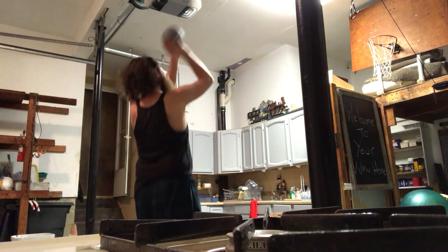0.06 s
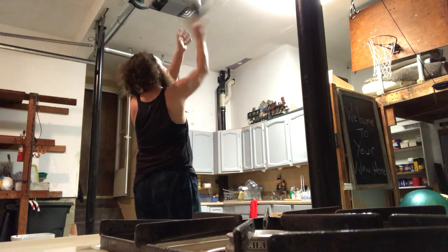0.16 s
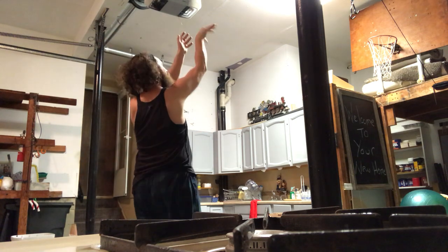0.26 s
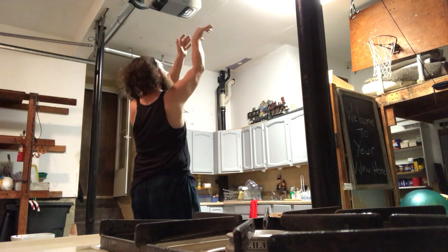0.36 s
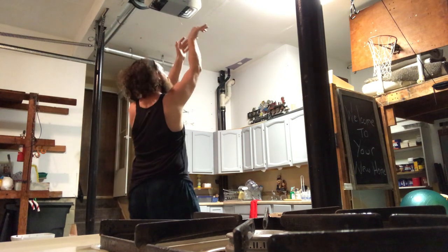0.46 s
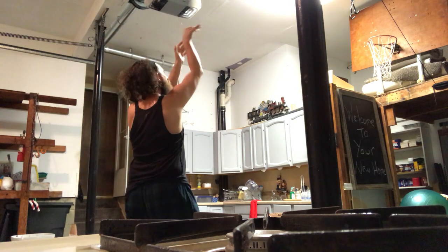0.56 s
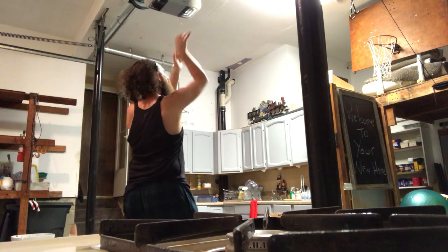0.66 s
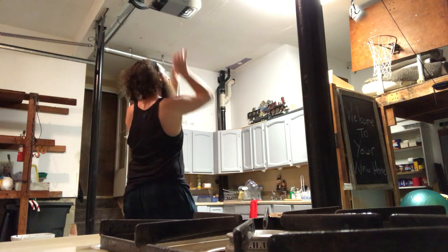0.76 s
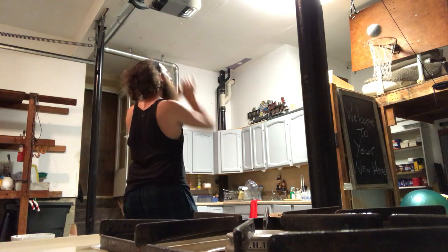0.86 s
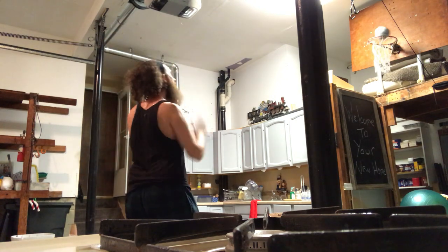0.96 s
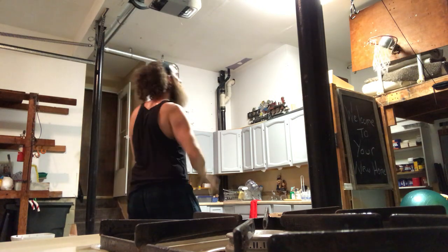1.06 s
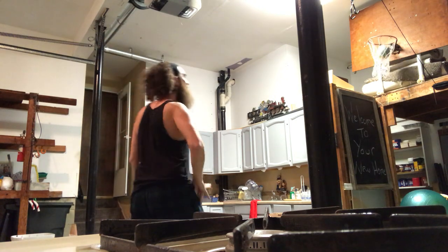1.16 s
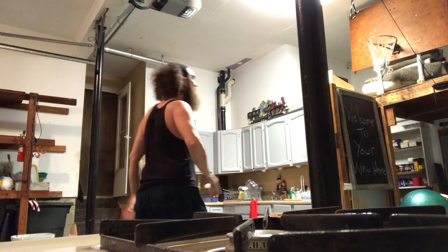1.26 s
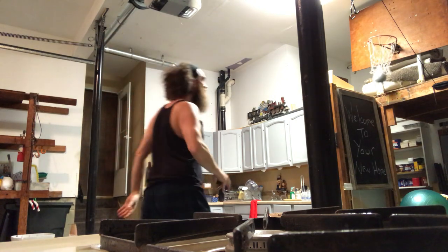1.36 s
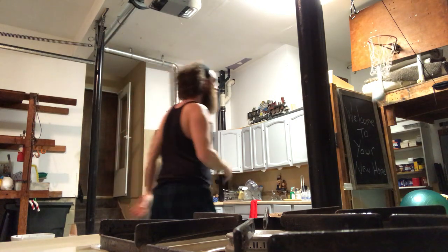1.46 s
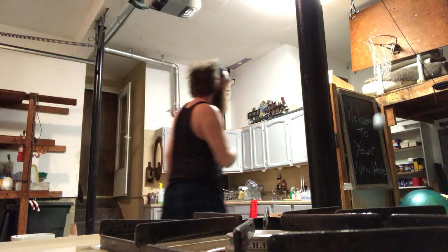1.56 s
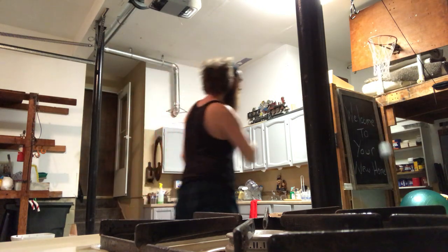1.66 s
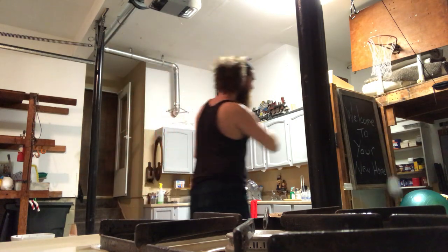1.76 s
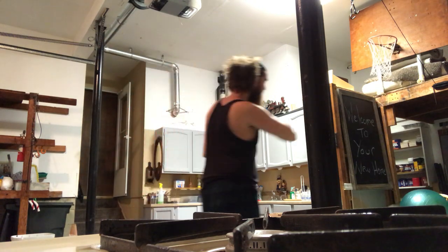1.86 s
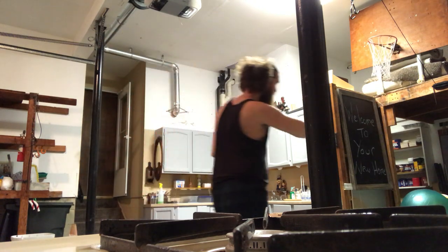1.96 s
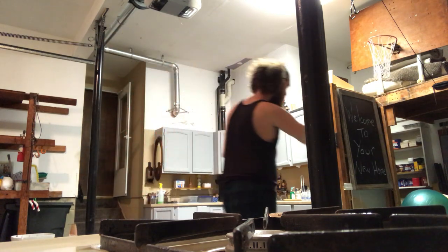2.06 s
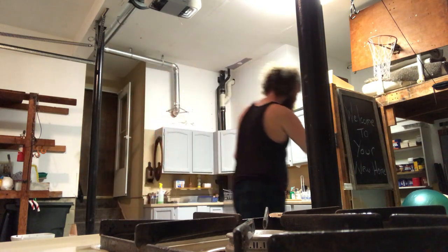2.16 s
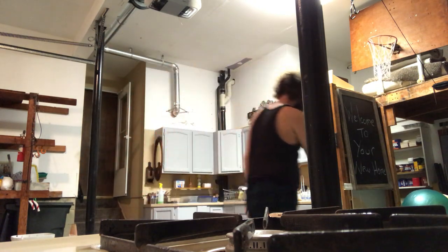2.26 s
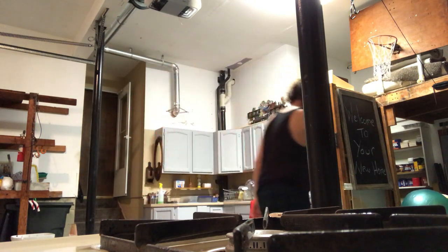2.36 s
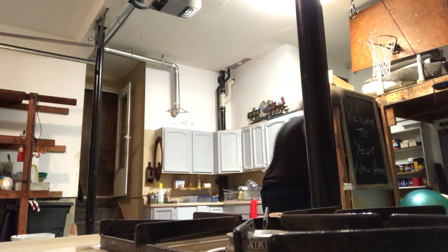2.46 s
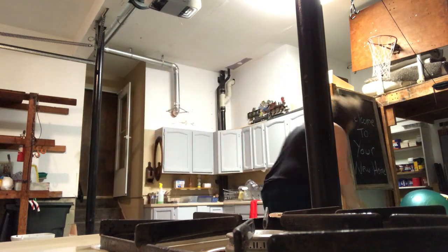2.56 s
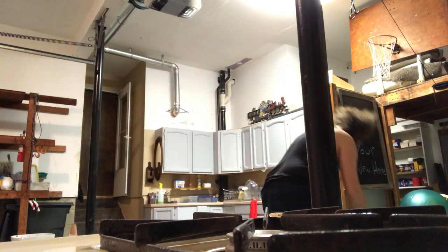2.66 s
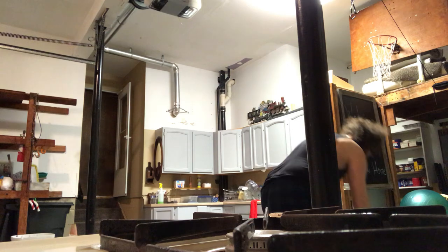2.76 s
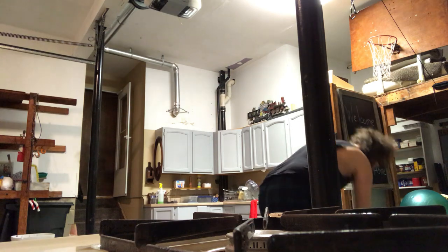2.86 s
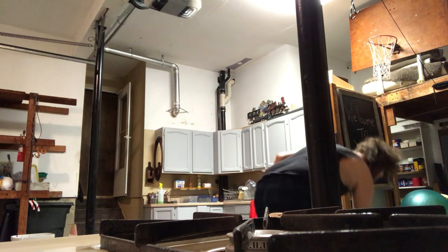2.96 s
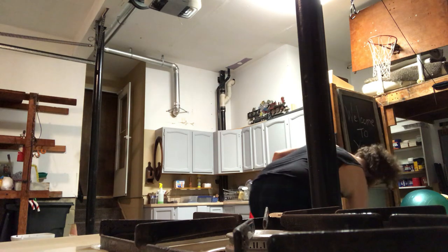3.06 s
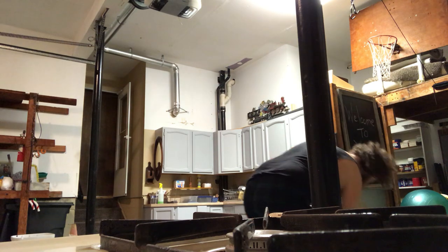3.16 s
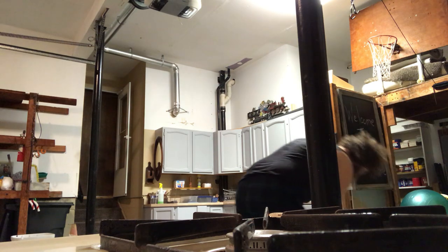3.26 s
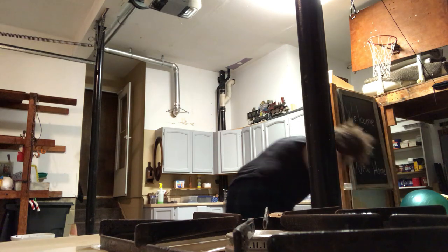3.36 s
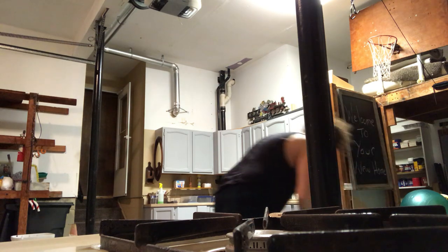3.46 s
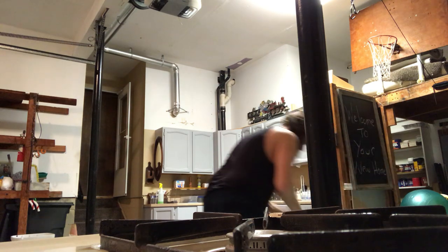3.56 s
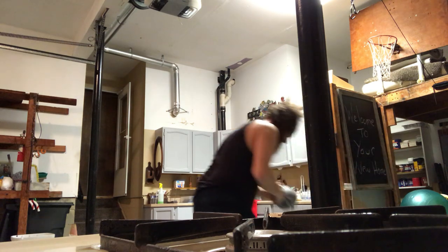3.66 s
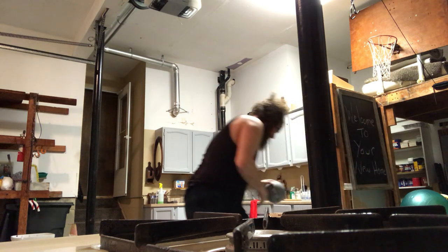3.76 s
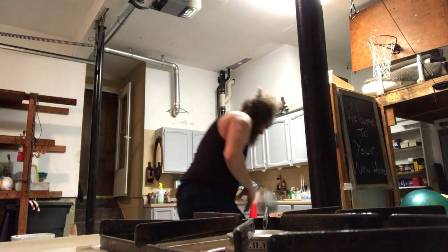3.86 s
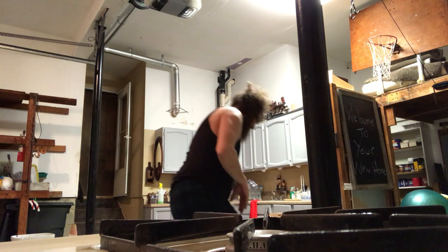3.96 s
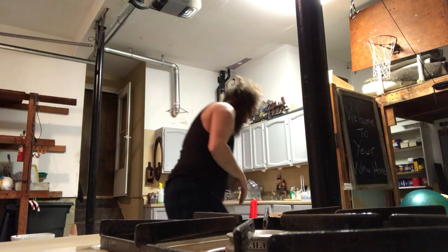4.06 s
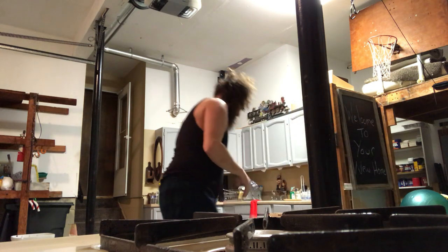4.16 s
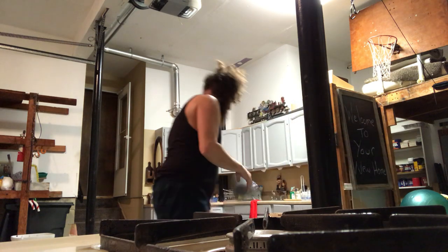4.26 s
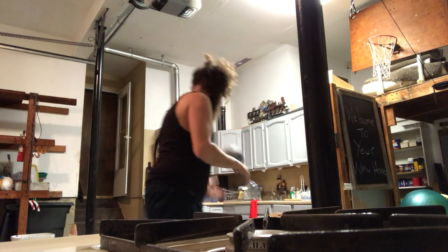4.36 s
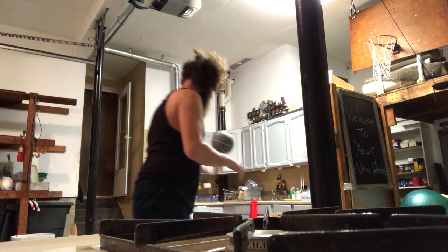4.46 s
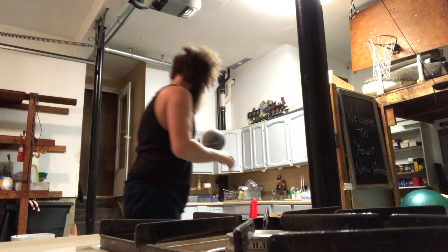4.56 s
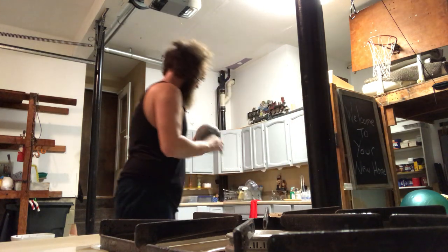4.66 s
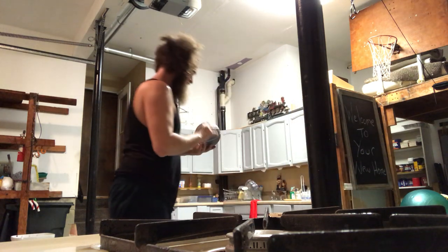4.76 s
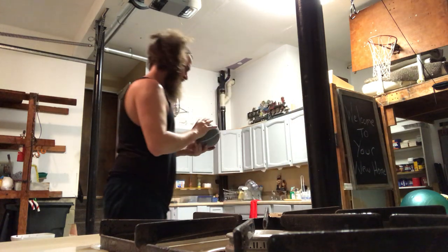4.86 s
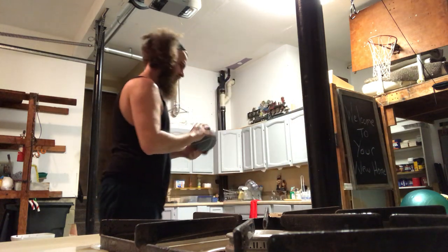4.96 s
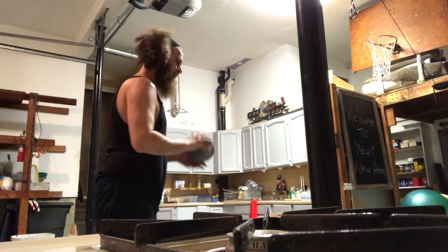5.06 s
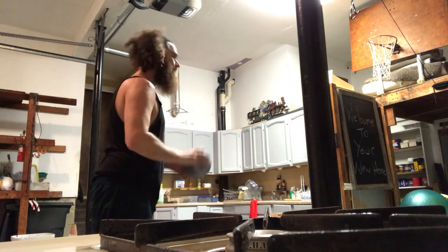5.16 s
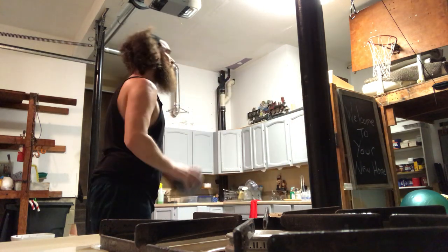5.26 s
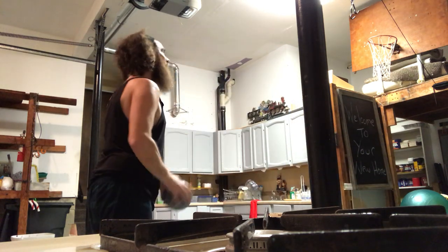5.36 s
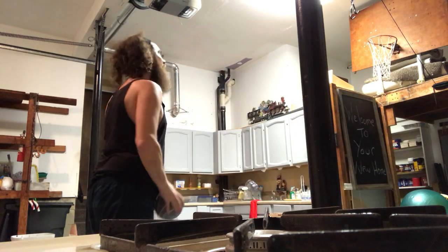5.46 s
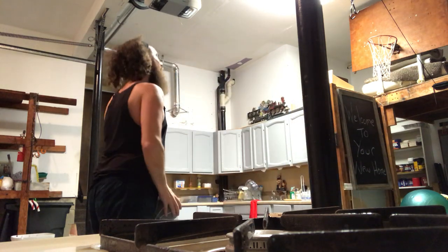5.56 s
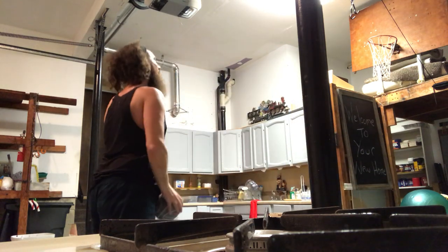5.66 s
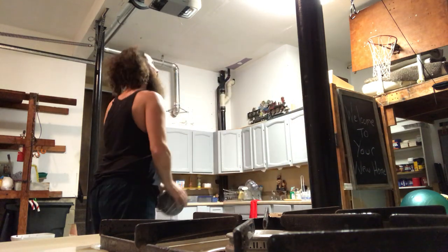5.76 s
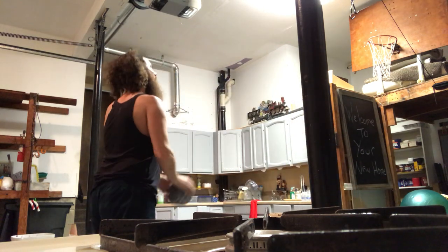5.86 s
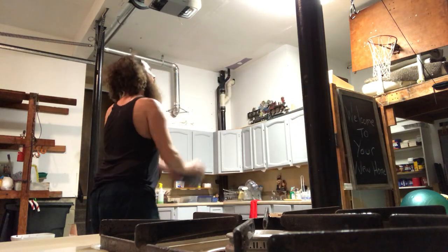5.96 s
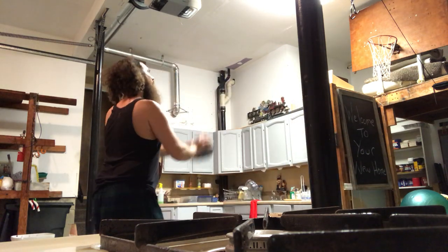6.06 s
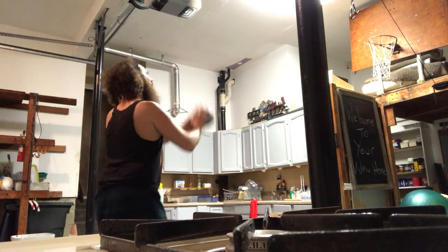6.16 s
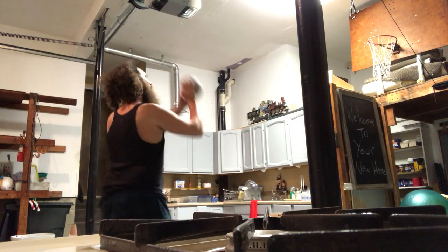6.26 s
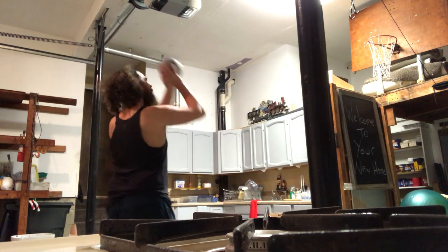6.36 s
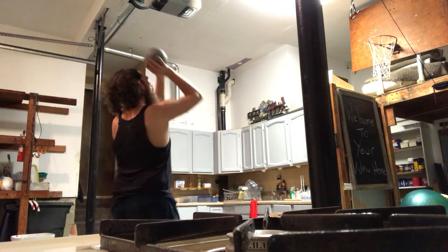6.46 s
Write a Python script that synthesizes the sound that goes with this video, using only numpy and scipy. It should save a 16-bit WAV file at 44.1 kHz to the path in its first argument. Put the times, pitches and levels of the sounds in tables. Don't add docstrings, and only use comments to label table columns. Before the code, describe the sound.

Over a low motor hum, a ball cracks against a board, knocks through cluttered shelves, and pings off a concrete floor amid gritty shoe scuffs.

```python
import sys
import numpy as np
from scipy import signal
from scipy.fft import rfft, irfft, next_fast_len
from scipy.io import wavfile
from scipy.ndimage import uniform_filter1d, map_coordinates

SR = 44100
rng = np.random.default_rng(int(sys.argv[2]) if len(sys.argv) > 2 else 0)


def level_to_linear(level):
    exponent = np.asarray(level, float) / 20
    return 10 ** exponent


def dump(signal):
    limited = np.clip(np.atleast_2d(signal).T, -1, 1)
    pcm = np.round(limited * 32767).astype(np.int16)
    wavfile.write(sys.argv[1], SR, pcm)


N = 287973


def unit(x):
    return x / np.sqrt(np.mean(x ** 2) + 1e-20)


def along(points, hz):
    f, v = np.transpose(points)
    return np.interp(np.log(hz + 1), np.log(f + 1), v)


def wobble(rate_hz):
    knots = rng.standard_normal(int(N * rate_hz / SR) + 4)
    return map_coordinates(knots, [np.arange(N) * rate_hz / SR])


def swell(s, db, rise_db_s, fade_db_s, hold_s=0):
    t = np.arange(N) / SR
    return level_to_linear(db - rise_db_s * np.maximum(s - t, 0) - fade_db_s * np.maximum(t - s - hold_s, 0))


def filtered(x, response):
    m = next_fast_len(len(x) + 8192)
    return irfft(rfft(x, m) * response(np.fft.rfftfreq(m, 1 / SR)), m)[:len(x)]


def coloured(x, spectrum):
    return unit(filtered(x, lambda hz: level_to_linear(along(spectrum, hz))))


def rush(spectrum, patchy_db):
    z = signal.stft(rng.standard_normal(N), nperseg=512)[2]
    field = uniform_filter1d(rng.standard_normal(z.shape), size=5, axis=0)
    field = uniform_filter1d(field, size=10, axis=1)
    x = signal.istft(z * level_to_linear(patchy_db * unit(field)), nperseg=512)[1][:N]
    return coloured(x, spectrum)


def grains(rate_hz, size_db):
    hits = rng.random(N) < rate_hz / SR
    return unit(hits * rng.standard_normal(N) * level_to_linear(size_db * rng.exponential(size=N)))


def garage(x, wet_db, fed=None):
    # (f/Hz, t60/s)
    decay = [(60, 0.18), (150, 0.59), (500, 0.55), (2000, 0.57), (6000, 0.52), (14000, 0.45)]
    # (t/s, gain on the tail/dB)
    early_gains = [(.010, -17), (.019, 0), (0.025, -7.5), (.032, -5.5), (0.042, 1)]
    hz, t, z = signal.stft(rng.standard_normal(SR), SR, nperseg=256)
    t60 = np.clip(along(decay, hz), .05, 2)[:, None]
    tail = signal.istft(z * level_to_linear(-60 * t / t60), SR, nperseg=256)[1][:SR]
    t = np.arange(SR) / SR
    tail *= 1 - np.exp(-t / 0.00249)
    tail *= level_to_linear(sum(db * np.exp(-((t - s) / 0.00055) ** 2) for s, db in early_gains))
    wet = signal.fftconvolve(x if fed is None else fed, level_to_linear(wet_db) * tail / np.linalg.norm(tail))
    return wet + np.pad(x, (0, SR - 1))


def body_response(modes):
    low, top = modes[0][0] * .6, modes[-1][0] * 1.6

    def response(f):
        ring = sum((-1) ** i * level_to_linear(g) * 1j * f * w / (c * c - f * f + 1j * f * w)
                   for i, (c, w, g) in enumerate(modes))
        high_pass = 1j * f / (low + 1j * f)
        low_pass = top ** 2 / (top ** 2 - f * f + 1.4j * f * top)
        return ring * (high_pass * low_pass) ** 2
    return response


def struck(events, body, contact_s, rough, lag_s, wet_db, bass_wet_db):
    # (from f/Hz, to f/Hz)
    bands = [(0, 250), (250, 950), (950, 2900), (2900, 20000)]
    out, t = np.zeros(N + 2 * SR), np.arange(8192) / SR
    for s, crack_db, thump_db, knock_db, ring_db in events:
        parts, power = [], 0
        for k, db in enumerate([thump_db, knock_db, ring_db, crack_db]):
            response = body_response([m for m in body if bands[k][0] <= m[0] < bands[k][1]])
            scrape = rough * k * rng.standard_normal(len(t)) * level_to_linear(-60 * t / contact_s)
            click = scrape + (t == 0)
            push = np.exp(-((t - lag_s) / 0.0014) ** 2)
            part = filtered(click if k else push, response)
            parts.append(level_to_linear(db) * part / np.abs(part).max())
            if k:
                smooth = np.abs(response(np.fft.rfftfreq(len(t), 1 / SR))) ** 2
                power = power + smooth / smooth.mean() * np.sum(parts[k] ** 2)
        radiated = np.roll(irfft(np.sqrt(power)), SR // 300)
        boom = garage(parts[0], bass_wet_db)
        wet = garage(sum(parts[1:]), wet_db, fed=radiated * (t < .1)) + boom
        out[round(s * SR):][:len(wet)] += wet
    return out[:N]


def ring_on(tones):
    out, t = np.zeros(N + 2 * SR), np.arange(SR // 2) / SR
    for s, hz, db, t60 in tones:
        partner_hz = hz * rng.uniform(1.01, 1.03)
        pair = np.sin(2 * np.pi * hz * t) + 0.97 * np.sin(2 * np.pi * partner_hz * t)
        envelope = level_to_linear(db - 60 * t / t60) * (1 - np.exp(-t / 0.0026))
        wet = garage(envelope * pair, wet_db=-2.5)
        out[round(s * SR):][:len(wet)] += wet
    return out[:N]


def motor():
    line_hz = [58.93, 117.86, 188.4, 235.72, 229.4]
    line_db = [-47.5, -60.5, -70.5, -65, -70]
    # (f/Hz, in step at t/s)
    beats = [(114.7, .228), (119.98, .368)]
    beat_db = [-60.5, -63.5]
    # (f/Hz, level/dB)
    rumble_tone = [(25, -36), (45, -2), (62, -7.5), (80, -12), (100, -9.5), (125, -7.5), (160, -13),
                   (230, -12.5), (500, -23), (1200, -37.5), (2500, -120)]
    # (f/Hz, level/dB)
    whine_tone = [(1230, -39.5), (1310, 6), (1360, -4), (1410, 8), (1480, -43.5)]
    turn = 2 * np.pi * (np.arange(N) / SR + np.cumsum(0.0005 * wobble(3.04)) / SR)
    lines = sum(level_to_linear(db + 3.5 + (.5 + 0.6 * k) * wobble(10.0)) * np.sin(hz * turn)
                for k, (hz, db) in enumerate(zip(line_hz, line_db)))
    for (hz, s), db in zip(beats, beat_db):
        phase = 2 * np.pi * (line_hz[1] - hz) * s
        lines += level_to_linear(db + 3.0 + 1.5 * wobble(3.4)) * np.sin(hz * turn + phase)
    rumble = level_to_linear(-56.0 + 0.86 * wobble(4.06)) * rush(rumble_tone, patchy_db=2.0)
    whine_gain = swell(5.44, -73, rise_db_s=99.5, fade_db_s=51.5, hold_s=0.43)
    return lines + rumble + whine_gain * rush(whine_tone, patchy_db=1.0)


def air_and_clothes():
    # (f/Hz, level/dB)
    hiss_tone = [(350, -35), (600, -15.5), (822, -9), (1170, -6), (1420, -6), (1670, -10.5), (2110, -8.5),
                 (2290, -11.5), (3370, -15.5), (4670, -17.5), (15800, -31.5)]
    room = level_to_linear(-79.5)
    earlier_bounce = swell(0, -71, rise_db_s=0, fade_db_s=28)
    chase = swell(2.37, -77.5, rise_db_s=11.5, fade_db_s=11.5, hold_s=2.95)
    arms_lift = swell(6.42, -77, rise_db_s=60, fade_db_s=0)
    gain = np.sqrt(room ** 2 + earlier_bounce ** 2 + chase ** 2 + arms_lift ** 2)
    return level_to_linear(6) * gain * rush(hiss_tone, patchy_db=1.5)


def loose_parts():
    # (t/s, f/Hz, level/dB, t60/s)
    tones = [(.942, 81, -20.5, 0.099), (.945, 259, -35, 0.13), (0.966, 3170, -46, 0.19),
             (1.015, 6610, -32.5, 0.037), (1.352, 682, -48, 0.16), (1.678, 720, -27.5, 0.047),
             (1.97, 1100, -53, 0.28), (2.034, 85.3, -20, 0.12), (2.04, 456, -38.5, 0.61),
             (2.04, 300, -34, 0.18), (2.275, 650, -38.5, 0.065), (2.275, 2250, -55, 0.17),
             (2.839, 983, -50, 0.34), (2.84, 1380, -52.5, 0.42), (2.84, 2990, -46.5, .25),
             (.03, 2110, -70, 0.6), (.03, 3360, -75, 0.34), (4.1, 809, -35.5, 0.22),
             (4.101, 268.7, -38, 0.26), (4.101, 1600, -42, 0.37), (2.278, 220, -37.5, 0.08)]
    return ring_on(tones)


def backboard():
    # (t/s, crack/dB, thump/dB, knock/dB, ring/dB)
    hits = [
        (.9285, -39, -32.5, -35, -37),
        (.936, -26.5, -36, -29.5, -43),
        (.9435, -28.5, -22, -20, -39),
        (1.0195, -31.5, -47, -46, -34),
        (1.189, -46.5, -38, -40, -59),
        (1.3505, -56, -52, -58, -42),
        (1.385, -60, -57, -65, -45),
        (1.491, -51.5, -57, -56, -64),
    ]
    # (f/Hz, width/Hz, level/dB)
    body = [(71, 34, 9), (202, 70, -7), (264, 120, 5.5), (680, 1000, -2.5), (1380, 1000, 9.5),
            (2140, 990, -1), (2950, 300, 6), (4250, 1680, 9.5), (6130, 1880, 9.5), (11960, 4400, -6.5)]
    return struck(hits, body, contact_s=0.068, rough=0.12, lag_s=0.0047, wet_db=3.5, bass_wet_db=4)


def hoop():
    # (f/Hz, level/dB)
    rattle_tone = [(88, -43), (150, 7), (396, 3.5), (490, 3.5), (656, -1), (860, 2.5), (1870, 1.5),
                   (6470, -19), (15500, -57)]
    chatter = coloured(grains(900, size_db=2.0), rattle_tone)
    struck_s, rest_s, rest_fade_db_s = 0.95, 1.359, 140
    jolt = swell(struck_s, -35, rise_db_s=1500, fade_db_s=128)
    swing = swell(struck_s, -45, rise_db_s=1500, fade_db_s=12.5)
    net = swell(1.354, -55, rise_db_s=250, fade_db_s=rest_fade_db_s, hold_s=0.037)
    shake = (jolt + swing + net) * swell(rest_s, 0, 0, rest_fade_db_s)
    return garage(level_to_linear(-3.0) * shake * chatter, wet_db=0.5)[:N]


def frame_sway():
    # (t/s, f/Hz, level/dB, t60/s)
    tones = [
        (1.161, 68.4, -37, 0.37),
        (1.759, 66.4, -39, 0.29),
        (1.95, 78, -37.5, 0.17),
    ]
    return ring_on(tones)


def thud():
    # (t/s, crack/dB, thump/dB, knock/dB, ring/dB)
    hits = [
        (1.6663, -38.5, -45, -46, -46),
        (1.678, -40.5, -32, -27.5, -30.5),
        (1.9538, -51, -36.5, -46.5, -57),
    ]
    # (f/Hz, width/Hz, level/dB)
    body = [(71.3, 13, 4), (220, 80, -5), (295, 86, -5), (720, 940, -11), (1100, 920, 3), (1600, 1300, -6),
            (3930, 3600, 2), (8160, 15000, -7.5)]
    return struck(hits, body, contact_s=0.029, rough=0.033, lag_s=0.0033, wet_db=9.5, bass_wet_db=4)


def tins():
    # (t/s, crack/dB, thump/dB, knock/dB, ring/dB)
    hits = [
        (1.8631, -31.5, -32.5, -37, -36.5),
        (1.8713, -33.5, -37.5, -38, -40.5),
        (2.2719, -25.5, -31.5, -33, -31.5),
        (2.2824, -29.5, -47, -35.5, -38.5),
        (2.3205, -29.5, -45, -64, -34),
    ]
    # (f/Hz, width/Hz, level/dB)
    body = [(107, 45, -3), (220, 110, -1.5), (370, 310, 9), (690, 590, 2.5), (1100, 330, -4.5),
            (2250, 280, -4), (3350, 1530, 4), (5600, 3500, 2), (11000, 7600, -8.5)]
    # (t/s, f/Hz, level/dB, t60/s)
    tones = [
        (1.864, 3120, -50, 0.099),
        (1.865, 5350, -38, .05),
        (2.026, 5350, -43.5, 0.088),
        (2.026, 2700, -43, 0.055),
    ]
    clatter = struck(hits, body, contact_s=0.054, rough=0.19, lag_s=0.0036, wet_db=1, bass_wet_db=4.0)
    return clatter + ring_on(tones)


def shelf():
    # (t/s, crack/dB, thump/dB, knock/dB, ring/dB)
    hits = [
        (2.0268, -29, -19, -40, -30),
        (2.037, -33.5, -21, -22, -36),
    ]
    # (f/Hz, width/Hz, level/dB)
    body = [(75, 20, -3), (150, 88, -9.5), (300, 56, -1.5), (456, 28, 2.5), (750, 1000, -12),
            (1100, 290, 9.5), (2700, 1300, 5), (3960, 1340, 5), (6190, 3500, -2.5), (10900, 3600, -14.5)]
    return struck(hits, body, contact_s=0.026, rough=0.2, lag_s=0.0023, wet_db=4.5, bass_wet_db=0.0)


def shoes():
    # (loudest at t/s, rise/s, grit/dB, rub/dB, sand/dB)
    scuffs = [(2.5, 0.022, -59, -57, -81), (2.79, 0.023, -70, -64, -74), (3.1, 0.047, -61.5, -62, -69),
              (3.42, 0.048, -47.5, -47.5, -58.5), (3.56, 0.088, -65.5, -52, -85),
              (3.74, 0.033, -59.5, -62, -69), (3.825, 0.047, -51.5, -66.5, -57), (4.37, .04, -56, -64, -65),
              (4.625, 0.026, -62, -59, -81), (4.756, 0.026, -57.5, -61.5, -69.5),
              (4.8, 0.054, -52.5, -69.5, -65), (5.93, 0.039, -72.5, -63, -85),
              (6.07, 0.046, -73.5, -73, -84)]
    # (f/Hz, level/dB) each
    grit_tone = [(410, -68.5), (700, -19), (747, -25), (787, -16.5), (1470, -1.5), (1650, -4), (2110, -4),
                 (2950, -2.5), (5430, -0.5), (15500, -24)]
    rub_tone = [(200, -20), (350, -3.5), (700, -3.5), (1300, -5), (2200, -5.5), (3200, -45)]
    sand_tone = [(3000, -40), (5500, -1.5), (9000, -0.5), (15500, -6)]
    sleeve_tone = [(260, -28), (480, 0), (850, -9.5), (1160, -3), (1400, -7), (1580, -22), (3000, -23),
                   (5000, -70)]
    grit = coloured(grains(6000, size_db=-0.5), grit_tone) * level_to_linear(.8 * wobble(60))
    rub = rush(rub_tone, patchy_db=-0.5)
    sand = rush(sand_tone, patchy_db=3.0)
    drag = np.zeros(N)
    for s, rise_s, grit_db, rub_db, sand_db in scuffs:
        rise_db_s = 20.5 / rise_s
        landing_s = s - 0.47 * rise_s
        drag += level_to_linear(-3.0) * swell(s, grit_db, rise_db_s, fade_db_s=150.5, hold_s=0.022) * grit
        drag += level_to_linear(-9.0) * swell(s, rub_db, rise_db_s, fade_db_s=75) * rub
        drag += swell(landing_s, sand_db, rise_db_s=1200, fade_db_s=220.5, hold_s=.04) * sand
    sleeve_gain = swell(6.406, -67.5, rise_db_s=198, fade_db_s=-45)
    return garage(drag + sleeve_gain * rush(sleeve_tone, patchy_db=3.5), wet_db=-7.5)[:N]


def crate():
    # (t/s, crack/dB, thump/dB, knock/dB, ring/dB)
    hits = [
        (2.7596, -54.5, -49, -42.5, -40),
        (2.8387, -28, -30, -36, -31.5),
        (2.8671, -33.5, -55, -48, -61),
        (3.0981, -52, -44, -38.5, -43.5),
    ]
    # (f/Hz, width/Hz, level/dB)
    body = [(113, 115, -6.5), (201, 100, -2.5), (365, 400, 2.5), (650, 430, -13), (951, 500, -1),
            (1220, 900, 16.5), (2220, 2100, 11), (2905, 640, 17.5), (4160, 1050, 14), (6600, 1760, 0),
            (11700, 6800, -45)]
    return struck(hits, body, contact_s=0.025, rough=0.14, lag_s=0.0057, wet_db=3.5, bass_wet_db=-1.0)


def slap():
    # (t/s, f/Hz, level/dB, contact/s, lead-in/dB)
    pockets = [
        (3.1734, 1740, -18, 0.0028, -51.5),
        (4.094, 2250, -12, 0.0028, -37),
    ]
    out, t = np.zeros(N), np.arange(N) / SR
    for s, hz, db, contact_s, lead_db in pockets:
        touching = (t > s) * np.exp(-np.abs((t - s) / contact_s) ** 4)
        out += level_to_linear(db) * np.sin(2 * np.pi * hz * (t - s)) * touching
        hiss = rush([(hz * 0.75, -30), (hz * .8, 0), (hz * 1.7, 0), (hz * 1.3, -30)], patchy_db=3.5)
        out += level_to_linear(lead_db - 1600 * np.abs(s - t)) * (t < s) * (t > s - .016) * hiss
    return out


def floor_bounces():
    # (t/s, crack/dB, thump/dB, knock/dB, ring/dB)
    hits = [
        (3.1732, -29.5, -25, -35.5, -22),
        (4.094, -22.5, -15, -27.5, -16),
    ]
    # (f/Hz, width/Hz, level/dB)
    body = [(111, 56, -10), (215.4, 22, -5), (308, 233, 13.5), (720, 190, -13), (1100, 800, -5),
            (1600, 565, 2), (1935, 247, 3.5), (2240, 610, -3.5), (3350, 900, -10), (4010, 1510, 20.5),
            (6800, 8200, 1), (12000, 3600, -20.5)]
    # (f/Hz, level/dB, t60/s)
    cavity = [(991, -18.5, 0.81), (1125, -8, 0.26), (1294, -18.5, 0.35), (1435, 0.5, 0.16),
              (1593, -19.5, 0.91), (1720, -14, 0.64), (2115, -7, 0.37), (2240, -22.5, 0.75),
              (2444, -15.5, 0.29)]
    shell = struck(hits, body, contact_s=0.013, rough=.06, lag_s=0.0022, wet_db=9, bass_wet_db=-2.5)
    tones = [(s + .001, hz, ring_db - 15.5 + db, t60)
             for s, *_, ring_db in hits for hz, db, t60 in cavity]
    return shell + ring_on(tones)


def scene():
    background = motor() + air_and_clothes() + loose_parts()
    goal = backboard() + hoop()
    shelves = frame_sway() + thud() + tins() + shelf() + crate()
    ground = shoes() + slap() + floor_bounces()
    return (background + goal + shelves + ground)[None]


def top_cut(x):
    return signal.sosfilt(signal.butter(12, 16470, fs=SR, output="sos"), x)


def record(dry):
    # (f/Hz, width/Hz, level/dB)
    port = [(5070, 550, -4.5), (10440, 720, -4.5)]

    def microphone(hz):
        dips = level_to_linear(sum(db * np.exp(-((hz - c) / w) ** 2) for c, w, db in port))
        bass_cut = (1j * hz / (24 + 1j * hz)) ** 2
        return bass_cut * dips * (hz < 15830)
    mix = filtered(dry[0], microphone)[None]
    return top_cut(mix)


dry = scene()
out = record(dry)
dump(out)
```